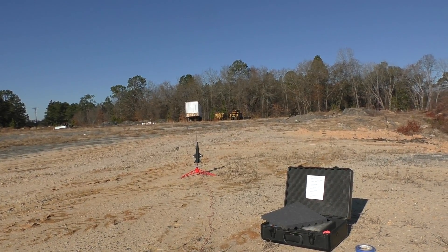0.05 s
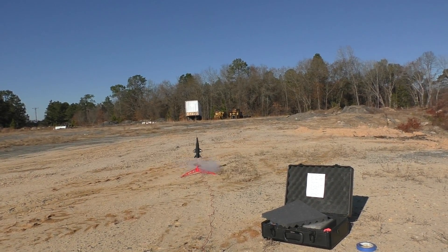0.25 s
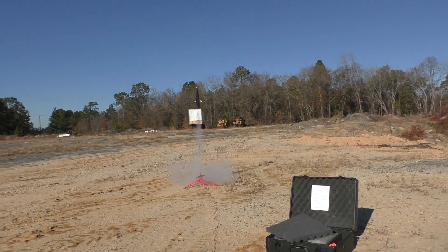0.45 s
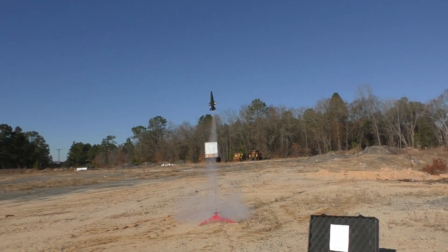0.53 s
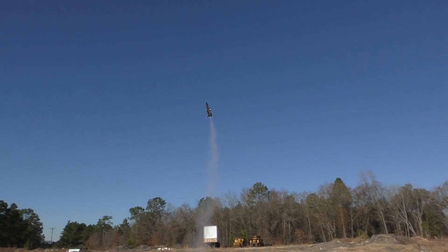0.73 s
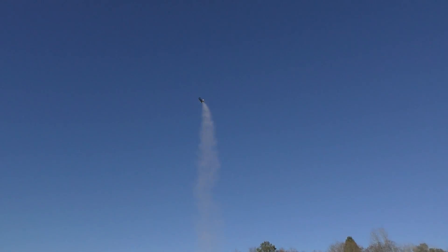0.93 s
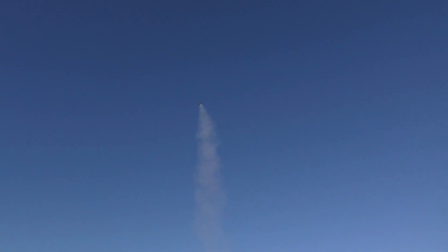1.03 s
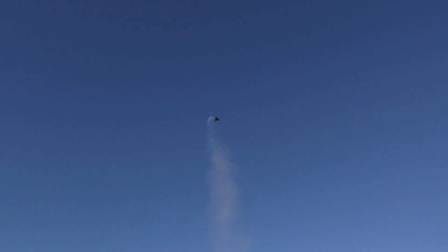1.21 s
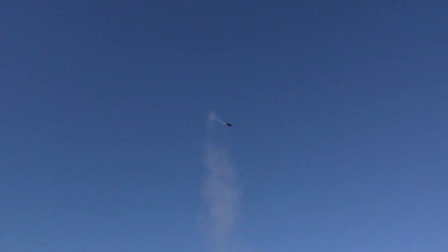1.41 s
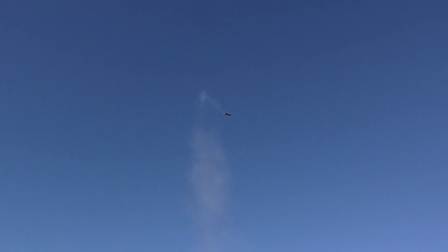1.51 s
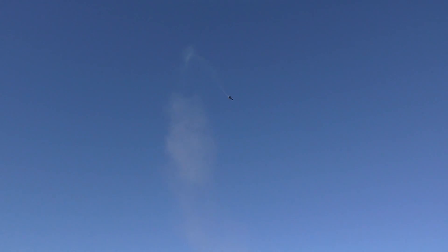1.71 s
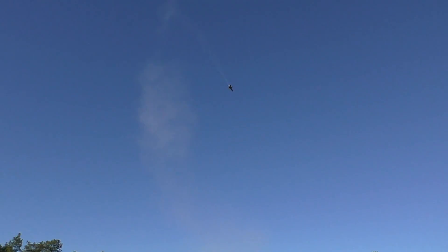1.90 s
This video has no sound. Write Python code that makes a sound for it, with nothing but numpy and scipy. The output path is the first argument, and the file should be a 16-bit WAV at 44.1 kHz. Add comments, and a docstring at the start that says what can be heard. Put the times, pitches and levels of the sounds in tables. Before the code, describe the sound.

Stereo microphones near the pad in an open sandy field catch quiet low background drone, a dry igniter snap, a fierce crackling rocket whoosh thinning as it climbs, then sudden burnout and a weak airy coasting hiss.

```python
"""On a sandy field, a pair of microphones hears a small rocket motor light with a crack, roar for about a second
as it climbs, then coast with a faint hiss. The motor is shaped noise with crackle and pops; the crack is a sum
of dying sines. An echo off the sand, its lag mostly growing with height, sweeps a comb through the hiss.
The tree line scatters the sound; field noise, a far engine and low wind, all shaped noise, lie below."""
import sys
import numpy as np
from scipy import signal
from scipy.io import wavfile
from scipy.ndimage import uniform_filter1d, map_coordinates

SR = 44100
rng = np.random.default_rng(int(sys.argv[2]) if len(sys.argv) > 2 else 0)


def amp(db):
    return 10 ** (np.asarray(db, float) / 20)


def wav_record(signal):
    """Record a signal, one row per channel, as 16-bit PCM in the file named by sys.argv[1]."""
    frames = np.transpose(np.atleast_2d(signal))
    bounded = np.clip(frames, -1, 1)
    # unit amplitude maps onto the largest positive 16-bit level
    quanta = np.round(bounded * 32767).astype(np.int16)
    wavfile.write(sys.argv[1], SR, quanta)


N = 85995  # length in samples
T = np.arange(N) / SR
HZ = np.fft.rfftfreq(512, 1 / SR)
FRAME_S = np.arange(N // 128 + 5) * 128 / SR

# Wind at the microphones: level in dB, upper corner in Hz.
WIND_DB, WIND_HZ = -51.5, 117

# Colour of the open field. Each row: frequency in Hz, relative density in dB per Hz.
FIELD_COLOUR = [(15, -50), (25, -33), (49, -18.5), (113, -16), (189, -2), (437, -16.5), (473, -22.5),
                (905, -25.5), (1010, -31), (1120, -21), (1320, -18), (2330, -26.5), (3130, -32),
                (5820, -56.5), (15800, -45)]
# Field level, sinking under the roar and swelling back. Each row: time in seconds, level in dB.
FIELD_LEVEL = [(0, -32.5), (.25, -32), (.33, -52), (.43, -47.5), (1.1, -49), (1.25, -42), (1.5, -37.5),
               (1.95, -31.5)]
# Far engine drone. Each row: frequency in Hz, level over the field wash in dB, width in Hz.
ENGINE_ORDERS = [(61, -8, 13), (123, -4.5, 11), (177, -11, 6.9)]
# Likeness of the field at the two microphones. Each row: frequency in Hz, left-right likeness (1 = same).
FIELD_SAME = [(60, 1), (130, 1), (290, 0.99), (640, 0.95), (1410, 0.84), (3100, 0.75), (6820, 0.84),
              (15000, 0.58)]
# Lean of the field to one side. Each row: frequency in Hz, left minus right in dB.
FIELD_PAN = [(60, -4), (110, 2), (200, -0.5), (380, -1), (700, 1), (1290, 1.5), (2380, 4.5), (4400, 5),
             (8120, -0.5), (15000, -0.5)]

# Scatter from field and tree line: level in dB, 60 dB decay and first delay in seconds.
TREES_DB, TREES_T60_S, TREES_LAG_S = -18, 0.4, 0.0091

# Sand echo behind the direct sound. Each row: time in seconds, lag in milliseconds.
GROUND_LAG = [(.36, .22), (.425, .33), (.52, .8), (.7, 1.75), (.94, 2.96), (1.03, 3.38), (1.12, 3.68),
              (1.2, 3.88), (1.3, 3.99), (1.45, 4.06), (1.6, 4.01), (1.77, 3.92), (1.95, 3.74)]
# Strength of that echo. Each row: time in seconds, level in dB, share that keeps its treble (0 to 1).
GROUND_ECHO = [(.3, -5, .1), (.45, -4, 0), (.57, -2.5, .2), (.8, -3, .15), (1.05, -1.5, .1), (1.4, -5, .5),
               (1.75, -2, .8), (1.95, -2, .8)]
GROUND_HZ = 3400  # low-pass corner for the dulled share, run forwards and backwards

# Edges of the exhaust bands, in Hz.
BAND_EDGES_HZ = [400, 1000, 2000, 3200, 5000, 8500, 12500, 15700]
# Exhaust level. Each row: time in seconds, then the level in dB of each band between those edges.
EXHAUST_LEVEL = [(0.166, -38, -40, -36, -39, -44, -39, -47), (0.174, -41, -32, -40, -37, -30, -24, -38),
                 (0.184, -45.5, -34, -31.5, -30.5, -32, -24, -26),
                 (0.254, -34, -20.5, -21.5, -25.5, -17, -14.5, -15.5),
                 (0.284, -34.5, -20.5, -16.5, -22, -18, -19.5, -17),
                 (0.324, -38.5, -24, -23, -23.5, -21, -17, -23),
                 (0.368, -42, -26, -24.5, -23, -25, -15.5, -20),
                 (0.394, -39, -31, -27.5, -21, -22, -16.5, -19),
                 (0.424, -53, -40, -27, -32, -28.5, -24, -32),
                 (0.458, -48, -36, -32, -25.5, -31.5, -23, -28),
                 (0.488, -46, -36, -30, -28.5, -28.5, -23, -25.5),
                 (0.572, -39.5, -32.5, -24.5, -20.5, -26.5, -18, -23),
                 (0.692, -47, -34.5, -29.5, -25, -25, -24.5, -27),
                 (0.776, -42.5, -34.5, -28.5, -24.5, -23, -17.5, -21),
                 (0.896, -47.5, -35.5, -28, -24.5, -22.5, -18.5, -22.5),
                 (0.966, -59, -35.5, -31, -27, -25.5, -24, -29),
                 (1.01, -42.5, -31, -24.5, -24.5, -25, -22.5, -27),
                 (1.074, -42, -31, -26, -26.5, -25.5, -24.5, -28),
                 (1.094, -50, -30, -28.5, -26, -28, -25.5, -32),
                 (1.12, -38.5, -30.5, -28, -34, -38.5, -41, -49),
                 (1.154, -44, -45, -45, -48, -44, -43, -54), (1.224, -66, -50, -46.5, -47, -51.5, -56, -73),
                 (1.288, -54, -50, -41.5, -48.5, -47, -53.5, -55),
                 (1.392, -56, -43.5, -38, -44, -46, -45.5, -49),
                 (1.522, -48.5, -42.5, -42, -48.5, -54, -59, -66),
                 (1.706, -49.5, -42.5, -41.5, -47.5, -51, -59, -69),
                 (1.934, -44.5, -36.5, -35, -41, -44.5, -53.5, -56),
                 (1.95, -45, -38, -33, -41, -44, -50, -54)]
# Colour of the hiss under thrust as the microphones hear it: their own colour adds a dip near 5.5 kHz and peaks
# near 7 and 11 kHz. Each row: frequency in Hz, relative density in dB per Hz.
THRUST_COLOUR = [(150, -24), (400, -23.5), (740, -29.5), (1220, -7), (1720, -3), (2800, -1.5), (4150, -3.5),
                 (5050, -6), (5650, -8.5), (6950, -3.5), (8150, -7), (9350, -4), (11250, -2), (12850, -10),
                 (14200, -13), (15600, -15.5)]
# Exhaust colour after burnout. Each row: frequency in Hz, relative density in dB per Hz.
COAST_COLOUR = [(290, -22), (600, -22), (1000, -10), (1500, -2), (2100, 0), (2900, -1), (4000, -10),
                (5500, -17.5), (6800, -17.5), (8500, -22.5), (11000, -21), (15700, -29)]
BURNOUT_S, BURNOUT_FADE_S = 1.13, 0.036  # middle and length of the change of colour
PATCHY_DB, SPUTTER_DB = 0.9, 1.5  # rms of the level swings

# Flame crackle before the sand echo. Each row: time in seconds, level in dB.
CRACKLE_LEVEL = [(.2, -42), (.245, -22), (.29, -23), (.34, -31.5), (.41, -35.5), (.44, -40.5), (1.0, -43),
                 (1.1, -34), (1.15, -70)]
CRACKLES_PER_S, CRACKLE_SPREAD_DB, CRACKLE_S = 500, 3, 0.00011
# Loudest pops of the flame, before the sand echo. Each row: time in seconds, peak in dB.
POPS = [(.2515, -9), (.2655, -6), (.2712, -5), (.282, -10), (.2995, -12), (.306, -13), (.325, -16)]
POP_S = .00009  # decay time of one pop

# Igniter crack: start in seconds, level in dB.
CRACK_S, CRACK_DB = .1598, -6
# What the crack rings. Each row: frequency in Hz, relative level in dB, 60 dB decay in seconds.
CRACK_RING = [(1620, -4, 0.0041), (2600, -2, .004), (3560, 1, 0.0049), (5400, 3, 0.0017),
              (6700, 1.5, 0.0016), (10500, 4, 0.0016), (13900, -7, 0.00072)]
# Near echoes of the crack. Each row: delay in milliseconds, level against the crack in dB.
CRACK_ECHOES = [(.58, -16), (1.95, -32)]

# Likeness of the rocket at the two microphones. Each row: frequency in Hz, left-right likeness (1 = same).
ROCKET_SAME = [(60, 0.31), (130, 0.28), (290, 0.6), (640, 1), (1410, 0.98), (3100, 0.99), (6820, 1),
               (15000, 1)]
# Lean of the rocket to one side. Each row: frequency in Hz, left minus right in dB.
ROCKET_PAN = [(400, 0), (800, -.5), (1150, -0.5), (1550, -5), (2150, 0), (2950, 0.5), (4100, 2.5),
              (5000, 2), (6000, 0.5), (8600, 0), (9800, 2), (11000, 1.5), (12100, 0), (13400, 3.5),
              (14700, 0.5), (15500, 2)]
# Phase of the rocket between microphones. Each row: frequency in Hz, radians by which left leads.
ROCKET_LEAD = [(0, 0), (1210, 0.02), (1550, 0.1), (2070, 0.82), (2760, 0.0), (3880, 0.16), (5000, 0.04),
               (9470, 0.0), (9820, 0.1), (11400, -0.0), (12900, 0.1), (13800, -0.4), (14600, -0.1),
               (16600, -0.0)]

BASS_CUT_HZ, EDGE_HZ = 44, 15750  # bass and treble limits
CEILING = .86  # soft limit of the waveform, before the treble limit


def evened(x):
    """Scales to rms 1."""
    return x / np.sqrt(np.mean(x ** 2) + 1e-20)


def read(points, hz):
    """Reads a spectrum on a log-frequency axis."""
    f, value = np.transpose(points)
    return np.interp(np.log(hz + 1), np.log(f + 1), value)


def curve(points, t):
    """Reads a curve over time."""
    return np.interp(t, *np.transpose(points))


def lowpass(x, hz):
    """Second-order low-pass."""
    return signal.lfilter(*signal.butter(2, hz, fs=SR), x)


def microphones(shared, other, hz, same, pan, lead):
    """Left and right spectra: a shared sound plus an unrelated one of opposite sign, with level and phase offsets."""
    likeness = np.clip(read(same, hz), -1, 1)[:, None]
    alike = np.sqrt((1 + likeness) / 2) * shared
    unlike = np.sqrt((1 - likeness) / 2) * other
    # each side takes half the level and phase difference
    side = (amp(read(pan, hz) / 2) * np.exp(.5j * read(lead, hz)))[:, None]
    return np.array([(alike + unlike) * side, (alike - unlike) / side])


def wind():
    """Lumpy low buffeting: low-passed noise with slow level swings, unrelated on each microphone."""
    lumps = amp(1.3 * evened(lowpass(rng.standard_normal((2, N)), 8.9)))
    return amp(WIND_DB) * evened(lowpass(rng.standard_normal((2, N)), WIND_HZ) * lumps)


def field():
    """Broad outdoor wash of shaped noise, with the orders of a far engine as narrow humps in its spectrum."""
    hz = np.fft.rfftfreq(4096, 1 / SR)
    a, b, c, d = rng.standard_normal((N // 1024 + 6, len(hz), 4)).T
    power = amp(read(FIELD_COLOUR, hz)) ** 2
    power = power / power.sum()
    for centre, db, width in ENGINE_ORDERS:
        hump = np.exp(-.5 * ((hz - centre) / width) ** 2)
        power = power + amp(2 * db) * hump / hump.sum()  # amp(2 * db) is a power ratio
    pair = microphones(a + 1j * b, c + 1j * d, hz, FIELD_SAME, FIELD_PAN, [(0, 0)])
    noise = signal.istft(pair * np.sqrt(power)[:, None], nperseg=4096, noverlap=3072)[1][:, :N]
    return evened(noise) * amp(curve(FIELD_LEVEL, T))


def scatter(x):
    """Diffuse return from the field and tree line: a decaying noise response, different on each side."""
    t = np.arange(SR // 2) / SR
    taps = rng.standard_normal((2, len(t))) * amp(-60 * t / TREES_T60_S) * (t > TREES_LAG_S)
    taps = taps / np.linalg.norm(taps[0])
    return amp(TREES_DB) * signal.fftconvolve(x[None], taps, axes=1)[:, :N]


def ground(x):
    """Direct sound plus a partly dulled echo off the sand; its moving lag makes a sweeping comb."""
    s, db, share = np.transpose(GROUND_ECHO)
    bright = np.clip(np.interp(T, s, share), 0, 1)
    dulled = signal.filtfilt(*signal.butter(1, GROUND_HZ, fs=SR), x)
    reflected = bright * x + (1 - bright) * dulled
    at = np.arange(N) - curve(GROUND_LAG, T) * SR / 1000  # fractional sample positions
    echo = np.array([map_coordinates(v, [at], order=3) for v in reflected])
    return x + amp(np.interp(T, s, db)) * echo


def exhaust():
    """Turbulent hiss whose bands follow the thrust, with patches and a fast sputter; two unrelated draws."""
    times, *band_levels = np.transpose(EXHAUST_LEVEL)
    edges = np.array(BAND_EDGES_HZ)
    centres = np.log(np.sqrt(edges[1:] * edges[:-1]))
    coast = np.clip((FRAME_S - BURNOUT_S) / BURNOUT_FADE_S + .5, 0, 1)
    shape_db = read(THRUST_COLOUR, HZ)[:, None] * (1 - coast) + read(COAST_COLOUR, HZ)[:, None] * coast
    # lift that brings each band of the colour to its level
    lift_db = []
    for low, high, level in zip(edges[:-1], edges[1:], band_levels):
        band_power = (amp(shape_db[(HZ >= low) & (HZ < high)]) ** 2).sum(0)
        lift_db.append(np.interp(FRAME_S, times, level) - 10 * np.log10(band_power))
    # weights that blend the lifts from one band centre to the next
    blend = np.array([np.interp(np.log(HZ + 1), centres, one) for one in np.eye(len(centres))])
    a, b, c, d, patches = rng.standard_normal((len(FRAME_S), len(HZ), 5)).T
    patches = evened(uniform_filter1d(uniform_filter1d(patches, 10, 0), 8, 1))
    size = amp(shape_db + blend.T @ np.array(lift_db) + PATCHY_DB * patches)
    spectra = np.array([a + 1j * b, c + 1j * d]) * size
    hiss = signal.istft(spectra, nperseg=512, noverlap=384)[1][:, :N]
    sputter = amp(SPUTTER_DB * evened(lowpass(rng.standard_normal(N), 410)))
    return hiss * sputter * (T > times[0] - .005)


def crackle():
    """Sparse steep shocks of the flame at random instants, uneven in size, all pushing the same way."""
    strike = rng.random(N) < CRACKLES_PER_S / SR
    size = amp(CRACKLE_SPREAD_DB * np.minimum(rng.exponential(1, N), 4)) * strike
    u = np.arange(128) / SR / CRACKLE_S
    shocks = evened(signal.oaconvolve(size, (u - 1) * np.exp(-u))[:N])
    return shocks * amp(curve(CRACKLE_LEVEL, T)) * (T > CRACKLE_LEVEL[0][0])


def pops():
    """Single steep shocks of the flame: a sudden jump, then a quick swing back through zero."""
    starts, peaks_db = np.array(POPS)[:, :1], np.array(POPS)[:, 1:]
    u = np.maximum(T - starts, 0) / POP_S
    return (amp(peaks_db) * (u - 1) * np.exp(-u) * (u > 0)).sum(0)


def ring(start, modes):
    """Sines that start together and die away exponentially."""
    t = np.maximum(T - start, 0)
    return sum(amp(np.maximum(db - 60 * t / t60, -200)) * np.sin(2 * np.pi * hz * t) for hz, db, t60 in modes)


def igniter():
    """One sharp crack of short ringing modes, repeated as its near echoes."""
    arrivals = [(0, 0)] + CRACK_ECHOES
    return sum(amp(CRACK_DB + db) * ring(CRACK_S + ms / 1000, CRACK_RING) for ms, db in arrivals)


def rocket():
    """Exhaust and flame over the sand plus the crack, spread over the two microphones, with their scatter."""
    shared_only = np.array([[1], [0]])
    flame = (crackle() + pops()) * shared_only
    source = ground(exhaust() + flame) + igniter() * shared_only
    z = signal.stft(source, nperseg=512, noverlap=384)[2]
    pair = microphones(z[0], z[1], HZ, ROCKET_SAME, ROCKET_PAN, ROCKET_LEAD)
    near = signal.istft(pair, nperseg=512, noverlap=384)[1][:, :N]
    return near + scatter(source[0])


def scene():
    """Wind and field behind the rocket."""
    return wind() + field() + rocket()


def band_limit(x):
    """A steep low-pass at the top of the band."""
    return signal.sosfilt(signal.butter(12, 17030, fs=SR, output="sos"), x)


def record(dry):
    """Bass roll-off, soft ceiling on the peaks, then a steep treble limit."""
    thin = signal.lfilter(*signal.butter(2, BASS_CUT_HZ, "high", fs=SR), dry)
    rounded = thin / (1 + (thin / CEILING) ** 4) ** (1 / 4)
    edge = signal.firwin(1023, EDGE_HZ, window=("kaiser", 9), fs=SR)
    mix = signal.oaconvolve(rounded, edge[None], "same")
    return band_limit(mix)


dry = scene()
out = record(dry)
wav_record(out)
```